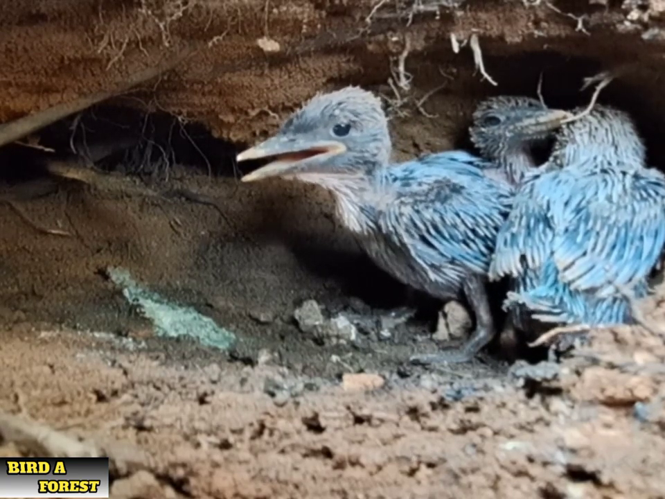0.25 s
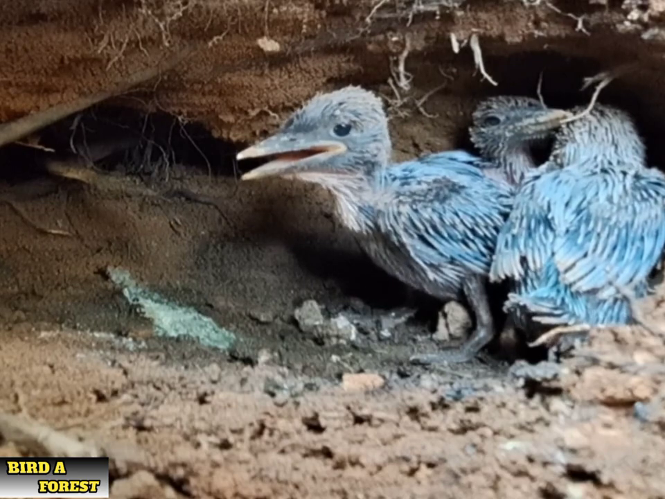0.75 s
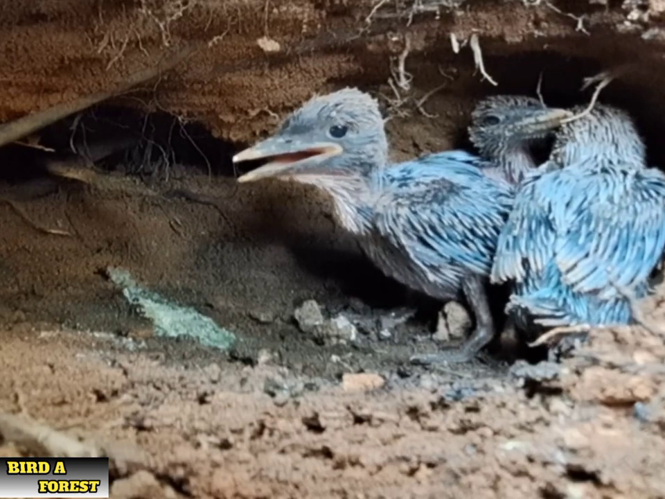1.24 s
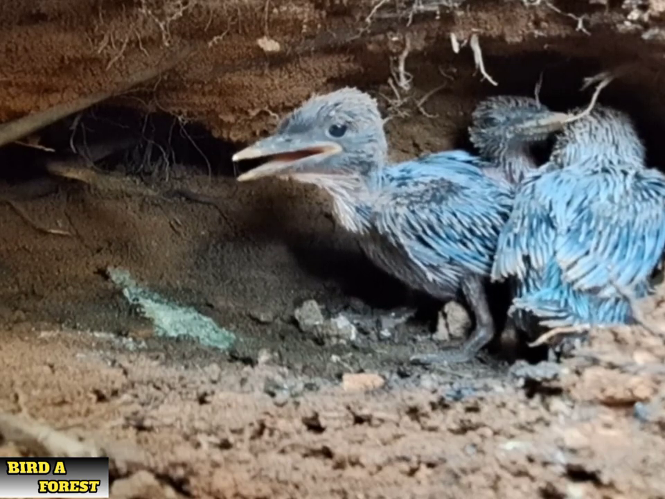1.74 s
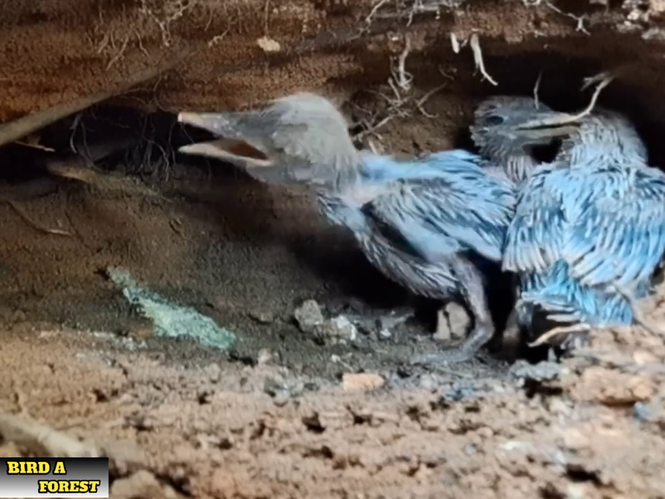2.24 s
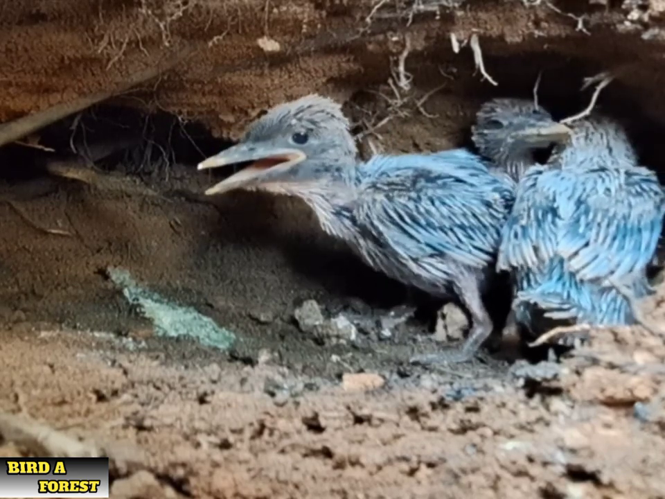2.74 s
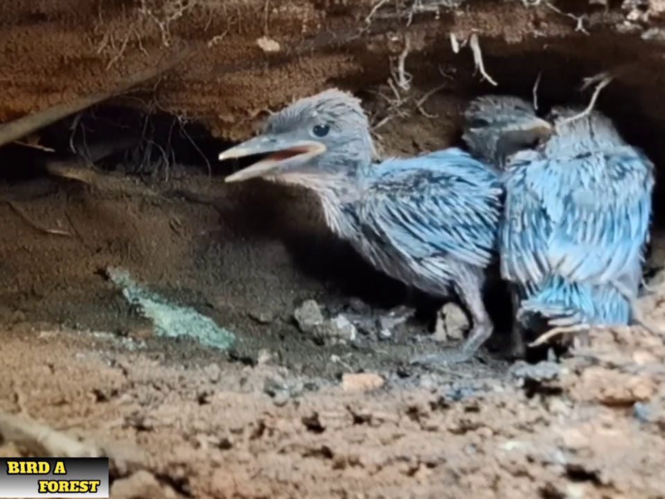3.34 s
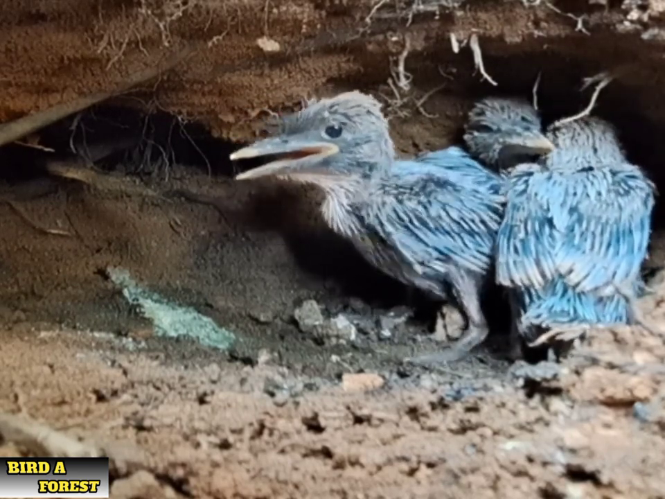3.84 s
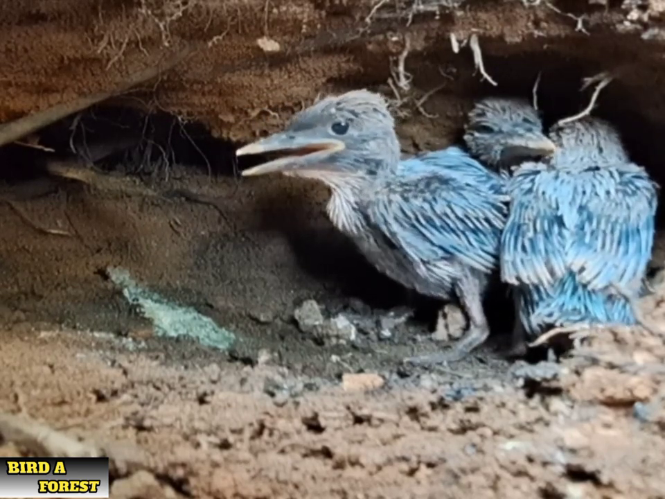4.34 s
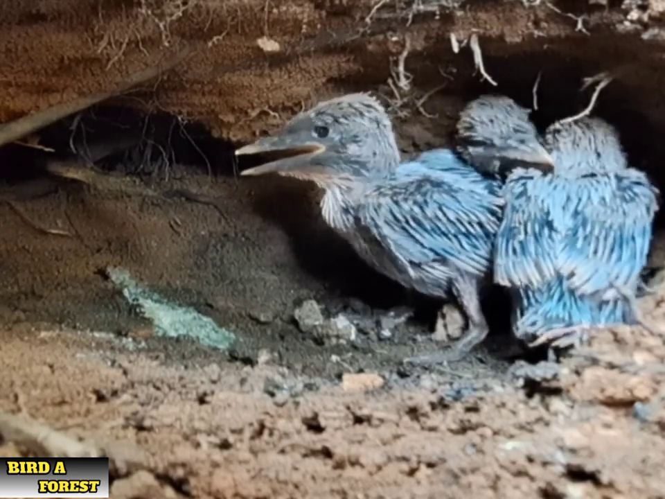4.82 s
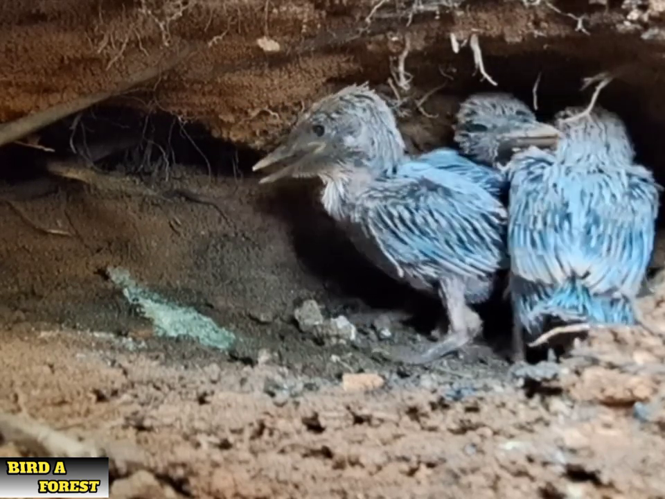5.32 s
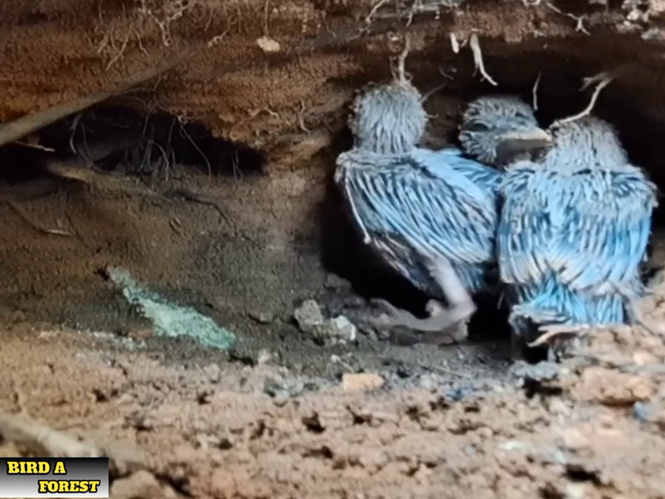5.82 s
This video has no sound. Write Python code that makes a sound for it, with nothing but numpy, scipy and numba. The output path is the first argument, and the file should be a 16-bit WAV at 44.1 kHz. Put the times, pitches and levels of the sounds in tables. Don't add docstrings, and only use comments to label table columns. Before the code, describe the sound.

Loud, rapid, dry churring from a begging young bird, about ten bursts a second, with strained long squawks between bouts and soft wind behind.

```python
import sys
import numpy as np
from scipy import signal
from scipy.fft import rfft, irfft
from scipy.io import wavfile
from scipy.ndimage import uniform_filter1d, minimum_filter1d, map_coordinates
from numba import njit

SR = 44100
rng = np.random.default_rng(int(sys.argv[2]) if len(sys.argv) > 2 else 0)


def gain_from_db(level_db):
    decades = np.asarray(level_db, float) / 20
    return 10 ** decades


def digitize_waveform(pressure):
    field = np.atleast_2d(pressure).T
    bounded = np.clip(field, -1, 1)
    quanta = np.round(bounded * 32767).astype(np.int16)
    wavfile.write(sys.argv[1], SR, quanta)


N = 267687
T = np.arange(N) / SR

# frequency in Hz, level in dB per Hz.
LEAF_COLOUR = [(150, -64), (250, -12), (480, -7), (900, -17), (1400, -13.5), (3000, -18), (5300, -13),
               (6500, -26), (7500, -28), (12500, -23), (15500, -44)]
LEAVES_DB = -54.5
# time in seconds, level in dB.
INSECTS = [(0, -59.5), (1.6, -58), (2, -71), (6.07, -69)]
# time in seconds, level in dB.
BREEZE = [(0, -41.5), (1.4, -39.5), (1.95, -48.5), (3.3, -48.5), (6.07, -43.5)]
FAR_SHELTER_DB = -13.5
# middle in seconds, near-port rise in dB, far-port rise in dB, half length in seconds.
GUSTS = [
    (0.314, 1, 14, .14),
    (1.54, 2, 5.5, 0.28),
    (3.52, 2, 17.5, 0.14),
    (5.36, 0.5, 11, 0.16),
    (5.705, 8, 16.5, 0.13),
    (5.83, -8, 12, 0.14),
]

# start in seconds, length in ms, peak in dB, time to peak in ms,
# opening blip in dB (-60 for none).
FIRST_BOUT = [(0.0, 32, -13.5, 0.92, -60), (0.075, 49.7, -10, 14, -14.5), (0.191, 45.3, -9.5, 9.5, -11.5),
              (0.301, 47, -8, 21.6, -14), (0.413, 50.7, -11.5, 25, -16), (0.521, 60.3, -12, 18, -10.5),
              (0.629, 54, -13, 8.2, -19), (0.738, 50.2, -15, 32, -60), (0.848, 68.2, -11.5, 26, -60),
              (0.969, 60.5, -12.5, 26, -60), (1.085, 57.8, -11, 16, -16.5), (1.195, 55.3, -12, 22, -16),
              (1.299, 53, -9.5, 13.6, -10), (1.408, 49.6, -11.5, 22, -13), (1.517, 53.4, -12.5, 12, -13),
              (1.63, 60, -14.5, 17, -13.5)]
SECOND_BOUT = [(2.562, 59, -11.5, 9.6, -16.5), (2.691, 80.8, -12, 23, -60), (2.829, 40.2, -10, 10, -8.5),
               (2.927, 43.4, -12, 8.7, -8), (3.031, 47.3, -13, 10, -13), (3.103, 67, -16.5, 26, -28),
               (3.197, 48.8, -13.5, 30, -60), (3.311, 47.3, -11.5, 21, -11.5),
               (3.413, 47.7, -11, 9.4, -11.5), (3.493, 47.4, -12, 26, -60), (3.597, 45.2, -9, 12.6, -10)]
THIRD_BOUT = [(3.868, 48.4, -11.5, 11, -10), (3.97, 49.7, -10, 13, -12), (4.064, 55.3, -10, 11, -16),
              (4.159, 45.3, -8.5, 15.5, -11), (4.266, 48.3, -9.5, 19, -8.5), (4.354, 46, -9.5, 3.9, -17),
              (4.453, 38.7, -10, 19, -9.5), (4.561, 38.3, -10, 21, -10), (4.667, 50, -10, 10, -7.5),
              (4.754, 55.5, -11, 6.9, -25), (4.841, 38.7, -7.5, 23, -25)]
LAST_BOUT = [
    (5.217, 68, -8, 7.5, -12),
    (5.287, 67.4, -7, 13, -60),
    (5.395, 57.3, -5.5, 8.5, -23),
    (5.504, 70, -8.5, 12, -8.5),
]
DRAWN_OUT = [
    (1.781, 320, -11.5, 24, -60),
    (2.161, 353, -12.5, 3, -5.5),
    (3.724, 84, -13.5, 24, -60),
    (4.976, 177.6, -11.5, 44, -60),
    (5.714, 227.5, -10.5, 18, -60),
    (6.004, 150, -12, 4, -60),
]
RUN_ONS = [
    (1.729, 52.6, -5.5, 13, -10.5),
    (2.622, 68.5, -12.5, 7.7, -60),
    (3.671, 52.3, -12.5, 15, -60),
    (4.92, 55.7, -8.5, 6, -16),
    (5.586, 53, -9, 2.5, -19),
    (5.639, 75, -7.5, 31, -60),
]
# churrs, start in dB, end in dB, release in ms, opening blip width in ms.
BOUTS = [
    (FIRST_BOUT, -19, -24, 45, 6.5),
    (SECOND_BOUT, -21.5, -24.5, 38, 4.3),
    (THIRD_BOUT, -16, -20.5, 42, 4),
    (LAST_BOUT, -22.5, -24.5, 65, 4.6),
    (RUN_ONS, -19, -17.5, 73, 6),
    (DRAWN_OUT, -19, -30, 15.1, 6),
]
LOUDEST_DB = -6
SAG_DB_PER_S = 8.5
OPENING_LEAD_MS = 4.74
# time in seconds, level in dB, width in ms.
CLOSING = [(0.0319, -17.5, 9.3), (0.1302, -15, 4.1), (0.3507, -23, 4), (0.4719, -24, 3.2),
           (0.7992, -13, 4.1), (1.1389, -12.5, 3.7), (1.2472, -11, 1.7), (1.3494, -25, 4.7),
           (1.4622, -11.5, 4.3), (1.5744, -15, 1.5), (1.6877, -14.5, 5.8), (2.875, -32.5, 8.7),
           (3.1773, -18.5, 13), (3.3668, -25, 4.2), (3.4676, -21, 5), (3.661, -19, 19),
           (4.2084, -13.5, 4.4), (4.3162, -18, 8), (4.408, -15, 10.5), (4.6015, -8.5, 6.8),
           (4.616, -15, 3.7), (4.8854, -11.5, 7.2), (5.1518, -13.5, 11.5)]
# time in seconds, level in dB, width in ms.
GULPS = [
    (.799, -20.5, 4.3),
    (1.692, -14.5, 6.8),
    (4.414, -20, 7),
    (5.572, -19.5, 7.5),
    (5.68, -17, 6),
]
LEAD_HZ, LEAD_DB = 780, -17

# frequency in Hz, width in Hz, level in dB.
CHEST = [(480, 200, -21), (700, 280, -15), (950, 200, -20)]
# frequency in Hz, width in Hz, level in dB.
GULLET = [(1366, 143, -14), (1614, 91, -20), (2254, 425, -0.5)]
# frequency in Hz, width in Hz, level in dB.
PALATE = [(4400, 226, -19), (4677, 383, -17), (5540, 620, -35.5)]
# frequency in Hz, width in Hz, level in dB.
STRAIN = [(5160, 420, -33)]
# frequency in Hz, width in Hz, level in dB.
GAPE = [(6560, 1300, -3.5), (7440, 810, -2), (7840, 190, -7.5), (8650, 1400, -2.5)]
# frequency in Hz, width in Hz, level in dB.
SHEEN = [(14900, 1100, -22)]
# time in seconds, lower resonance in Hz, upper resonance in Hz, upper share in dB.
THROAT = [(0.05, 2860, 3436, 3), (1.69, 2936, 3445, -2.5), (1.73, 2210, 3130, 0), (1.77, 2310, 3000, -9),
          (1.81, 2820, 3200, 1.5), (1.94, 2980, 3540, -13.5), (2.02, 2840, 3270, -1.5),
          (2.08, 2450, 2900, 12), (2.17, 2670, 3254, 7), (2.6, 2745, 3205, 2.5), (3.5, 2854, 3500, -4),
          (3.9, 2717, 3437, 8), (5.45, 2740, 3600, 3.5), (5.51, 2370, 3400, 3), (5.62, 2407, 3360, 0.5),
          (5.73, 2500, 3000, 1), (5.8, 2685, 3450, -2.5), (5.95, 2710, 3460, 7.5)]
# time in seconds, gape in dB, neck slack in dB, beak facing the port in dB.
POSTURE = [(0.05, -24.5, -4.5, -19), (1.69, -27, -4, -18), (1.74, -33, -9.5, -25), (1.81, -14, -12, -27),
           (1.94, -8, -16, -28), (2.08, -19.5, -3, -13), (2.19, -7.5, -20, -20), (2.35, -4, -16.5, -11.5),
           (2.6, -12.5, -10, -34), (3.25, -18, -6, -34), (3.45, -19.5, -7, -26), (4.2, -25.5, -10, -26),
           (4.5, -36, -11.5, -16.5), (5.42, -31, -15, -14.5), (5.6, -61, -11.5, -18.5),
           (5.7, -38, -8.5, -31.5), (5.9, -28.5, -16, -31), (6.04, -41, -13.5, -19)]
TIP_HZ, TIP_HZ_PER_NECK_DB, TIP_HZ_PER_GAPE_DB, WIDE_GAPE_DB = 11280, -72, -88, -16.5
PALATE_PER_TURN, SHEEN_PER_FACING = 0.44, 0.1
GAPE_RISE_PER_DB = 0.0072
PATCHY_DB = 2.5
TAUT_STEADY = 0.6
WAVER = 0.023

# frequency in Hz, width in Hz.
NEAR_NULLS = [(5900, 320), (9400, 900), (13700, 580), (14300, 560)]
NULL_WANDER = 0.024
# frequency in Hz, level in dB.
FAR_COLOUR = [(250, -7), (500, -17.5), (760, -33), (1100, -13.5), (1350, -23.5), (1800, -11), (2300, -14),
              (2600, -18), (3200, -32.5), (4000, -13.5), (4800, -22.5), (6000, -5.5), (7000, -18),
              (12000, -24.5)]
# time in seconds, far-port gain in dB.
TURN = [(0, 0.5), (1.7, 2), (3.6, 0.5), (4, -0.5), (5.4, -1.5), (5.7, 4), (6.07, -0.5)]
TOP_HZ = 15600


def unit(x):
    return x / np.sqrt(np.mean(x ** 2))


def follow(table):
    s, *columns = np.transpose(table)
    return [np.interp(T, s, c) for c in columns]


def walk(rate):
    k = int(SR / rate)
    steps = np.repeat(rng.standard_normal(N // k + 1), k)
    return 1.3 * uniform_filter1d(uniform_filter1d(steps, k), k)[:N]


def shade(x, points):
    hz, db = np.transpose(points)
    f = np.maximum(np.arange(N // 2 + 1) * SR / N, 1)
    return irfft(rfft(x) * gain_from_db(np.interp(np.log(f), np.log(hz), db)), N)


@njit
def svf(x, hz, width):
    y, band, low = np.empty(len(x)), 0., 0.
    for i in range(len(x)):
        g, k = np.tan(np.pi * hz[i] / SR), width / hz[i]
        v = (band + g * (x[i] - low)) / (1 + g * (g + k))
        band, low, y[i] = 2 * v - band, low + 2 * g * v, k * v
    return y


def ring(x, hz, width):
    hz = hz + np.zeros(N)
    once = svf(x, hz, 1.496 * width)
    return svf(once, hz, 1.496 * width) * np.sqrt(SR / (1.91 * width))


def body(x, modes):
    return sum((-1) ** k * gain_from_db(db) * ring(x, hz, width) for k, (hz, width, db) in enumerate(modes))


def forest():
    leaves = unit(shade(rng.standard_normal((2, N)), LEAF_COLOUR)) * gain_from_db(LEAVES_DB + 0.5 * walk(3.24))
    chorus = np.array([ring(rng.standard_normal(N), 5300, 900) for _ in "lr"])
    return leaves + chorus * gain_from_db(follow(INSECTS)[0])


def buffeting(low_db):
    low = gain_from_db(low_db + 2.3 * walk(19)) * ring(rng.standard_normal(N), 57.0, 30)
    high = gain_from_db(0.5 + 3.28 * walk(12)) * ring(rng.standard_normal(N), 129, 88)
    return low + high


def wind():
    db = follow(BREEZE) + np.array([[0], [FAR_SHELTER_DB]])
    for s, near_db, far_db, half in GUSTS:
        db += np.array([[near_db], [far_db]]) * np.maximum(1 - np.abs(T - s) / half, 0)
    return np.array([buffeting(-4), buffeting(1.0)]) * gain_from_db(db)


def tail(t60):
    t = T[:8192]
    h = rng.standard_normal(len(t)) * np.exp(-np.log(1000) * t / t60)
    return h / np.sqrt(np.sum(h ** 2))


def openings():
    found = []
    for churrs, *_, width_ms in BOUTS:
        for start, *_, db in churrs:
            if db > -50:
                found.append((start - OPENING_LEAD_MS / 1000, db, width_ms))
    return np.array(found)


def blips(table, hz, glide):
    env, pitch = np.zeros(N), np.full(N, 1. * hz)
    for s, db, width in table:
        half = width / 1500
        part = slice(int((s - half) * SR), int((s + half) * SR))
        u = (T[part] - s) / half
        env[part] += gain_from_db(db) * np.cos(np.pi * u / 2) ** 2
        pitch[part] = hz * np.exp(-glide * u)
    return env, pitch


def tone(hz):
    return np.sqrt(2) * np.sin(2 * np.pi * np.cumsum(hz) / SR)


def gulps():
    env, pitch = blips(GULPS, 830, 0.095)
    lead_env, lead_pitch = blips(openings() + [-.0008, LEAD_DB, 1.5], LEAD_HZ, -0.208)
    return env * tone(pitch) + lead_env * tone(lead_pitch)


def effort():
    env = np.zeros(N)
    for churrs, start_db, end_db, release_ms, _ in BOUTS:
        for start, length_ms, peak_db, rise_ms, _ in churrs:
            peak, end = start + rise_ms / 1000, start + length_ms / 1000
            hold = max(end - release_ms / 1000 - peak, 0)
            sagged_db = peak_db - SAG_DB_PER_S * hold
            db = np.minimum([start_db, peak_db, sagged_db, end_db], LOUDEST_DB)
            corners = [start, peak, peak + hold, max(end, peak + hold)]
            part = slice(max(int(start * SR), 0), int(end * SR))
            env[part] = gain_from_db(np.interp(T[part], corners, db))
    return uniform_filter1d(env, size=60) * gain_from_db(1.23 * walk(280))


@njit
def pulses(hz, rough, chance):
    out, phase, k = np.zeros(len(hz) + 1), 0., 0
    for i in range(len(hz)):
        step = hz[i] * np.exp(rough[i] * chance[k, 0]) / SR
        phase += step
        if phase >= 1:
            phase, k = phase - 1, k + 1
            size = np.exp(rough[i] * chance[k, 1])
            out[i] += size * phase / step
            out[i + 1] += size * (1 - phase / step)
    return out[:-1]


def pulse_train(hz, rough):
    train = pulses(hz, np.full(N, rough), rng.standard_normal((N // 8, 2)))
    return unit(train - train.mean())


def syrinx():
    flow = effort()
    chaos = pulse_train(1000 * np.exp(.2 * walk(30)), .42)
    voice = unit(chaos + 0.58 * rng.standard_normal(N)) * flow
    for table, hz, glide, rough, db in [(openings(), 800, -.15, .12, -3), (CLOSING, 1500, .15, .05, -2)]:
        env, pitch = blips(table, hz, glide)
        voice += gain_from_db(db) * pulse_train(pitch, rough) * env
        flow = flow + gain_from_db(db - 8.5) * env
    gusty = gain_from_db(1.8 * walk(60))
    return voice + 1e-18, flow * gusty * rng.standard_normal(N) + 1e-18


def held(voice):
    sounding = 1. * (uniform_filter1d(np.abs(voice), size=150) > .004)
    return uniform_filter1d(sounding, size=5000) ** 5 * uniform_filter1d(sounding, size=150)


def nestling():
    low_hz, high_hz, share_db = follow(THROAT)
    gape_db, gullet_db, tip_db = follow(POSTURE)
    wide_db = np.maximum(gape_db - WIDE_GAPE_DB, 0)
    tip_hz = TIP_HZ + TIP_HZ_PER_NECK_DB * gullet_db + TIP_HZ_PER_GAPE_DB * wide_db
    voice, air = syrinx()
    taut = held(voice)

    wobble = np.exp(.025 * (1 - TAUT_STEADY * taut) * walk(150))
    upper = gain_from_db(share_db + 2.4 * walk(45))
    throat = upper * ring(voice, high_hz / wobble, 394) - gain_from_db(0.6) * ring(voice, low_hz * wobble, 280)
    throat = throat / np.sqrt(1 + upper ** 2)
    low = gain_from_db(gullet_db) * body(voice, GULLET) - gain_from_db(0.9 * (gullet_db + 5)) * body(voice, CHEST)

    core = ring(voice, .985 * low_hz * np.exp(WAVER * walk(30)), 80)
    high_core = ring(voice, high_hz * np.exp(1.9 * WAVER * walk(35)), 116)
    core = core - gain_from_db(0.54 * share_db - 6.5) * high_core
    strain = taut * body(voice, STRAIN) - gain_from_db(-5.5) * taut * core

    palate = gain_from_db(0.15 * share_db + PALATE_PER_TURN * follow(TURN)[0]) * body(voice, PALATE)
    climb = 1 + GAPE_RISE_PER_DB * (gape_db + 14.5)
    mouth = [(hz * climb, width, db + PATCHY_DB * walk(18)) for hz, width, db in GAPE]
    tip = gain_from_db(tip_db - 1.0 + PATCHY_DB * walk(14)) * ring(air, tip_hz, 3400)
    beak = gain_from_db(gape_db) * body(air, mouth) + tip
    sheen_db = 0.35 * gape_db + SHEEN_PER_FACING * (tip_db + 26) + 1.7 * PATCHY_DB * walk(11)
    sheen = gain_from_db(sheen_db) * body(air, SHEEN)
    return throat + low + strain - palate + beak + sheen + gulps()


def near_port(voice):
    near = voice + gain_from_db(-21.0) * signal.fftconvolve(voice, tail(0.051))[:N]
    for hz, width in NEAR_NULLS:
        near = near - svf(near, hz * np.exp(NULL_WANDER * walk(2.43)), 1. * width)
    return near


def far_port(voice):
    bob = 1.4 * walk(25)
    late = map_coordinates(voice, [np.arange(N) - 4.5 + bob], order=3)
    wet = late + gain_from_db(-8.0) * signal.fftconvolve(voice, tail(0.11))[:N]
    return shade(wet, FAR_COLOUR) * gain_from_db(follow(TURN)[0])


def scene():
    voice = nestling()
    return np.array([near_port(voice), far_port(voice)]) + wind() + forest()


def top_cut(x):
    return signal.sosfilt(signal.butter(12, 15810, fs=SR, output="sos"), x)


def record(dry):
    room_left = np.minimum(1 / (np.abs(dry) + 1e-9), 1)
    gain = uniform_filter1d(minimum_filter1d(room_left, size=15), size=15)
    low_pass = signal.ellip(8, .2, 70, TOP_HZ, fs=SR, output="sos")
    return top_cut(signal.sosfilt(low_pass, dry * gain))


dry = scene()
out = record(dry)
digitize_waveform(out)
```